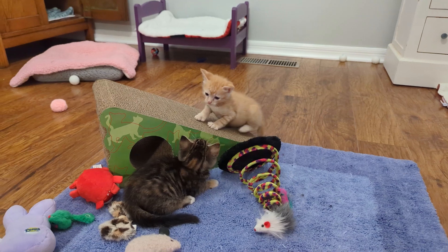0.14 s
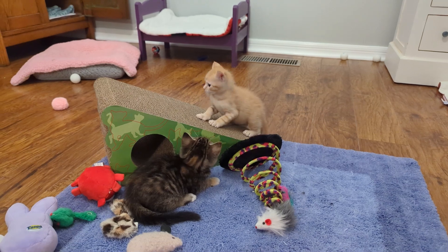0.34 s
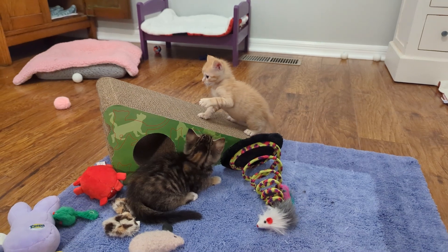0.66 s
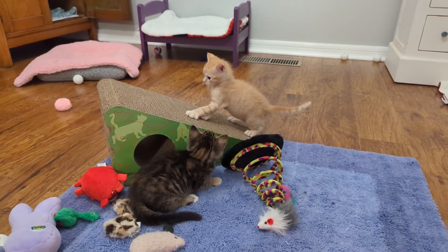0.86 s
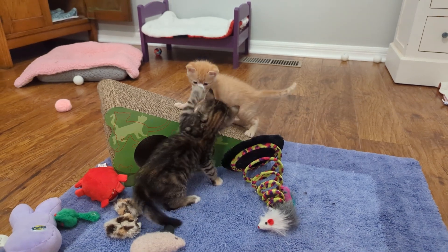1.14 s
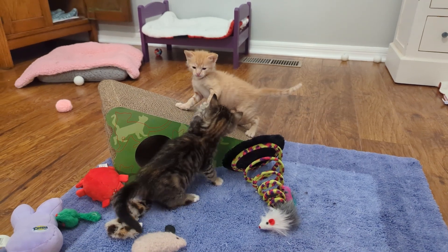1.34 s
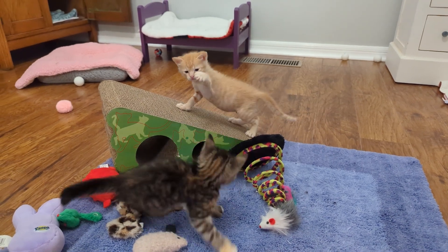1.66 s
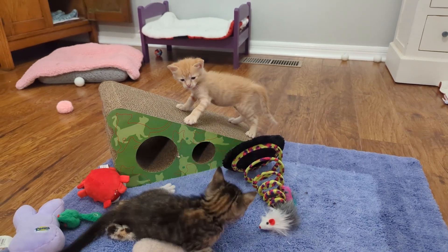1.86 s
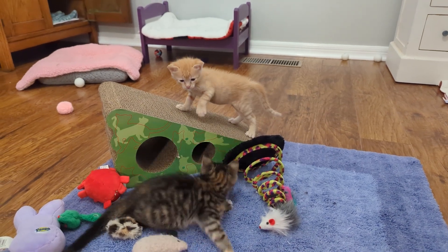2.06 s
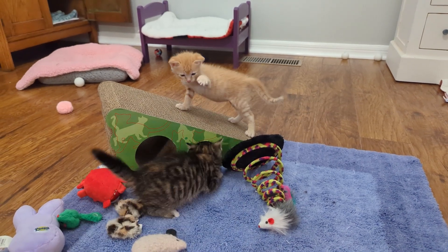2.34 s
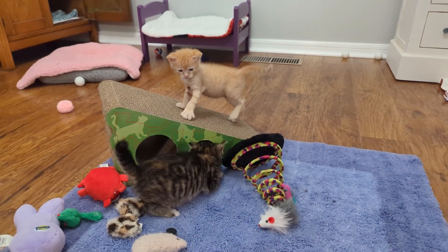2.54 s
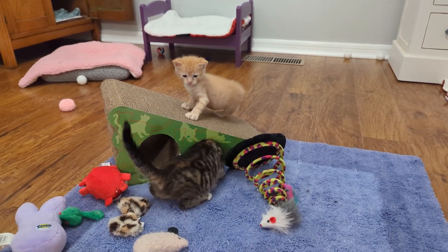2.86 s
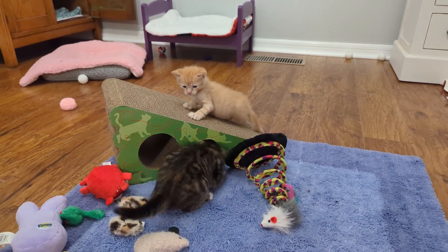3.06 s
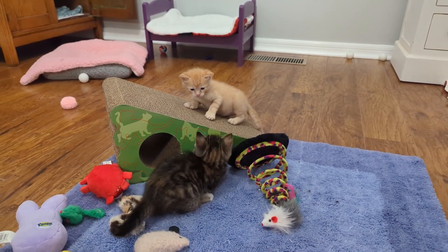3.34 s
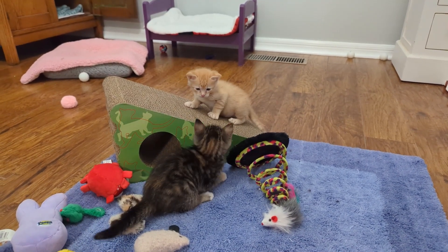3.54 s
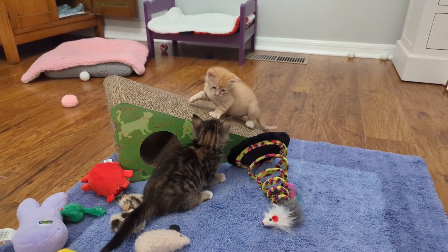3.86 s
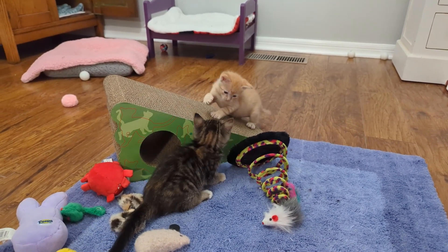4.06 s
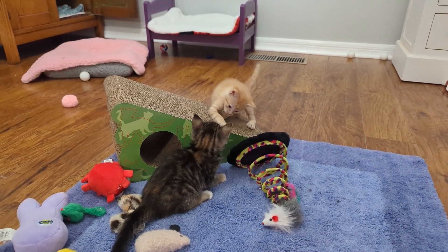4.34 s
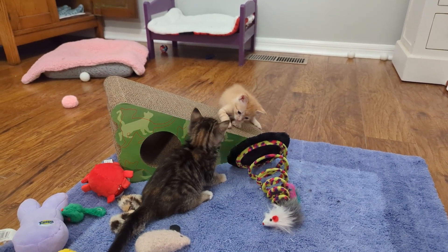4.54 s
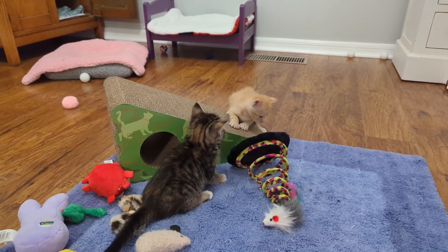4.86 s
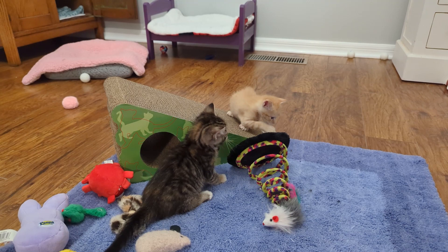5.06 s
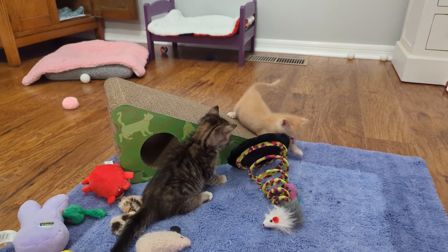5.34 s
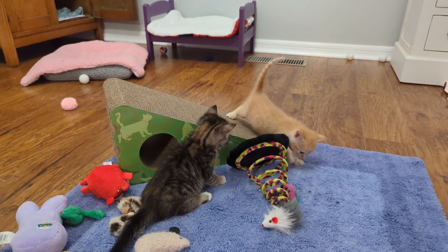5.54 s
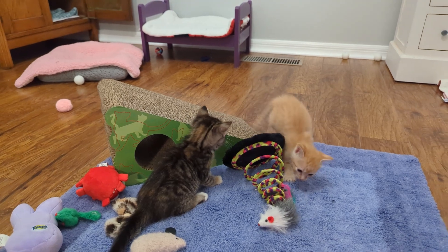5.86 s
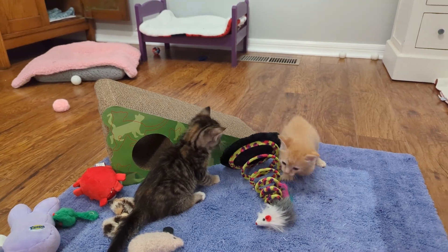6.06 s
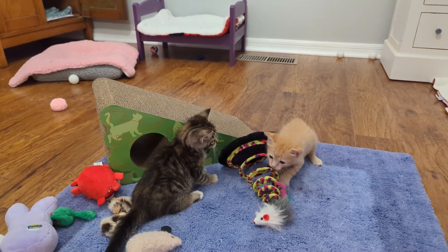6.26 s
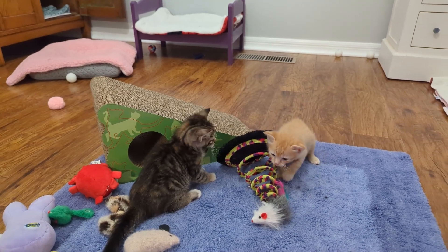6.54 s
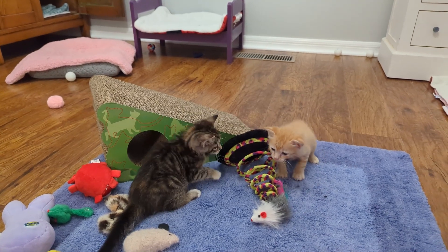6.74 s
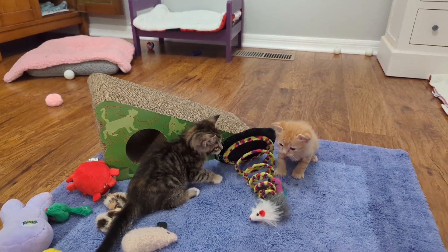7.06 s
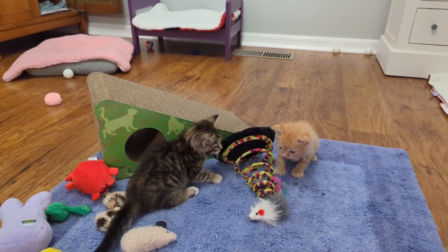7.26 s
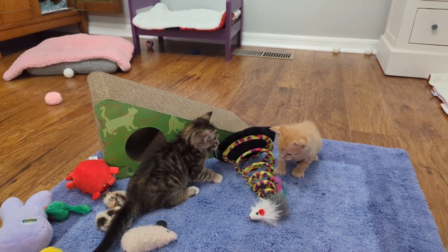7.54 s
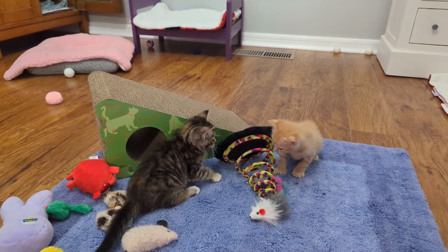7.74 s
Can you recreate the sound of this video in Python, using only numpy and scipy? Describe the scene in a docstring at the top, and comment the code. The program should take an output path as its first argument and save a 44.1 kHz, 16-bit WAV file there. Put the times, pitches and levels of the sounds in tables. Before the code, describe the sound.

Over a steady low fan hum, small claws tick, scratch and tap corrugated cardboard, busiest early on, then fading to faint rustles and a soft thump.

```python
"""In a quiet room, two kittens climb a hollow corrugated cardboard ramp on a rug.
A fan motor hums through a floor vent: wandering tones over low rumble, airflow noise and a faint whine.
Claws knock (short bursts and box ringing) and snap free (bright ticks); paws rub (shaped noise)
and land (dull bursts and puffs), and the floor booms faintly. Knocks, snaps and landings get echoes.
Two spaced microphone ports hiss faintly."""
import sys
import numpy as np
from scipy import signal
from scipy.fft import rfft, irfft, next_fast_len
from scipy.io import wavfile
from scipy.ndimage import map_coordinates

SR = 44100
rng = np.random.default_rng(int(sys.argv[2]) if len(sys.argv) > 2 else 0)


def store_pcm(level_fs):
    """Save levels as 16-bit WAV."""
    pcm = np.round(np.clip(level_fs, -1, 1) * 32767).astype(np.int16)
    wavfile.write(sys.argv[1], SR, np.atleast_2d(pcm).T)


N = 348831  # length in samples


def amp(db):
    """Turns decibels into gain."""
    return 10 ** (np.asarray(db) / 20)


def unit(x):
    """Scales a sound to an average (rms) level of 1."""
    return x / np.sqrt(np.mean(x ** 2) + 1e-20)


def along(points, hz):
    """Reads a curve of (pitch, value) points, spacing pitch the way we hear it (log)."""
    f, v = np.transpose(points)
    return np.interp(np.log(hz + 1), np.log(f + 1), v)


def curves(rows):
    """Draws a line through each column after the time, one value per sample."""
    s, *cols = np.transpose(rows)
    return np.array([np.interp(np.arange(N) / SR, s, c) for c in cols])


def wobble(rate):
    """Draws a smooth random curve through a given number of random points a second."""
    knots = rng.standard_normal(int(N * rate / SR) + 4)
    return map_coordinates(knots, [np.arange(N) * rate / SR])


def filtered(x, response):
    """Multiplies each frequency in the sound by a (possibly complex) response."""
    m = next_fast_len(N + SR // 2)  # room for the sound to ring out
    hz = np.fft.rfftfreq(m, 1 / SR)
    return irfft(rfft(x, m) * response(hz), m)[..., :N]


def rush(spectrum, alike, pair):
    """Colours two unrelated noises and mixes them into stereo, as alike left and right as asked."""
    def mid_side(hz):
        turn = np.arccos(np.clip(along(alike, hz), -.3, 1)) / 2
        return amp(along(spectrum, hz)) * [np.cos(turn), np.sin(turn)]

    mid, side = filtered(pair, mid_side)
    return unit(np.array([mid + side, mid - side]))


def pan(left_right_db):
    """Splits a left-right level difference into two gains; plus is left."""
    return amp([[left_right_db / 2], [-left_right_db / 2]])


def add(track, s, sound, left_right_db):
    """Lays a mono sound on a stereo track."""
    at = round(s * SR)
    track[:, at:at + len(sound)] += pan(left_right_db) * sound


def burst(hz, cycles, t):
    """A short wave that swells for the given number of cycles, then dies away."""
    u = t * hz / cycles
    return np.e * u * np.exp(-u) * np.sin(2 * np.pi * hz * t)


# how strongly the vent blows: start_s, rumble_db, airflow_db
VENT_LEVELS = [(0.0, -49.5, -75), (0.37, -53, -74.5), (2.09, -49.5, -69.5), (2.82, -48.5, -67.5),
               (4.21, -49, -69.5), (4.6, -48, -67.5), (7.91, -49, -70)]
# fan motor tones, around a wandering level: pitch_hz, level_db, wander_db, left_right_db, left_lead_rad
MOTOR_TONES = [(59.65, -71.5, 2.5, -1, 0), (75.3, -65.5, 4, 2.5, 0.013), (109.5, -53.5, -0.3, -0.8, 0.26),
               (163.3, -70.5, 2, 6.5, 0.31), (209.8, -59, 1.5, -3, 0.16), (273.3, -72.5, 3.5, 6, 0.15),
               (332.2, -61, 1.6, 5.5, -0.24), (350.8, -57.5, 2.5, 0, 0.35),
               (416.6, -74.5, 0.5, -4.5, -0.62)]
# colour of the low rumble: pitch_hz, relative_level_db (per Hz)
RUMBLE_COLOUR = [(20, -21), (35, -17), (55, 11.5), (90, 3), (140, 8), (195, 6.5), (250, 7), (350, 8.5),
                 (400, 1), (470, -1.5), (560, -45.5)]
# colour of the moving air: pitch_hz, relative_level_db (per Hz)
AIRFLOW_COLOUR = [(300, -32), (480, -6.5), (660, -10.5), (830, -9.5), (1060, -14), (1580, -20.5),
                  (1850, -25), (2400, -33.5), (3400, -36.5), (4400, -46.5), (6000, -89.5)]
# how alike the vent noise is on both sides: pitch_hz, likeness (no unit; below -0.3 counts as -0.3)
VENT_LIKENESS = [(60, 0.93), (110, 0.96), (200, 0.92), (380, 0.76), (700, 0.15), (1290, -0.43),
                 (2380, -0.86), (4400, 0.53), (8120, -0.16), (15000, -0.13)]


def vent():
    """Motor tones wander a little in level and phase over duct rumble and airflow noise."""
    rumble_db, airflow_db = curves(VENT_LEVELS)
    t = np.arange(N) / SR
    tones = np.zeros((2, N))
    for hz, db, wander_db, left_right_db, lead in MOTOR_TONES:
        side_lead = np.array([[lead / 2], [-lead / 2]])
        phase = 2 * np.pi * hz * t + 0.22 * wander_db * wobble(3.5) + side_lead
        level = amp(db + 3.5 + wander_db * np.tanh(wobble(9)))
        tones += level * pan(left_right_db) * np.sin(phase)
    rumble = amp(-6.5) * rush(RUMBLE_COLOUR, VENT_LIKENESS, rng.standard_normal((2, N)))
    airflow = rush(AIRFLOW_COLOUR, VENT_LIKENESS, rng.standard_normal((2, N)))
    flicker_db = 0.46 * wobble(8.7)
    motor_gain = amp(rumble_db - rumble_db.mean())  # the tones rise and fall with the rumble
    return amp(rumble_db) * rumble + motor_gain * tones + amp(airflow_db + flicker_db) * airflow


# air past the grille, around a flickering level: pitch_hz, width_hz, level_db
GRILLE_WHINE = (3430, 110, -100)


def whine():
    """Air past the grille makes a narrow, flickering band of noise that follows the airflow level."""
    hz, width, db = GRILLE_WHINE
    airflow_db = curves(VENT_LEVELS)[1]
    band = filtered(rng.standard_normal((2, N)), lambda f: np.exp(-((f - hz) / width) ** 2))
    level_db = db + airflow_db - airflow_db.mean() + 1.5 * wobble(6.2)
    return amp(level_db) * unit(band)


# claws knocking the cardboard flutes: start_s, level_db, pitch_hz, left_right_db, swell_cycles
CLAW_KNOCKS = [(0.422, -67, 1440, 2, 0.75), (0.9453, -61, 2160, 3, 1.2), (0.9515, -53.5, 1660, -2, 0.92),
               (1.576, -67, 1340, -6, .88), (1.871, -36, 2340, 4, 0.66), (1.8808, -38, 2020, -2, .48),
               (1.889, -31.5, 2040, -6, 0.3), (2.0293, -60, 1540, 4, .86), (2.374, -57, 1730, 0, 0.58),
               (2.5713, -62, 1540, 3, 0.68), (2.5975, -31.5, 2980, -.5, 1.01),
               (2.6044, -42, 1960, -5, 0.45), (2.7032, -44, 1860, 3, 0.53), (2.7332, -42.5, 2210, 4, 1.01),
               (2.9416, -34.5, 2190, 2.5, 0.87), (3.0309, -41.5, 1370, -1, 0.72),
               (3.116, -46, 2020, 2, 1.4), (3.22, -62, 1480, -4, .78), (3.7848, -65, 1430, 0, 1.1),
               (3.894, -64, 1380, 0, .99), (4.3926, -55, 1290, -1, 0.83), (4.3968, -48, 1380, 1, .7),
               (4.473, -57.5, 1280, -2, 0.96), (4.6264, -48, 1890, -1, .95), (4.6416, -47.5, 1240, 5, 0.75),
               (5.61, -58, 1000, -6, .95), (5.8324, -63, 1320, 2, 1.1), (5.864, -63, 1340, 2, .83),
               (6.1858, -58, 1520, 1, 0.87), (6.194, -56.5, 1200, 4, 0.88), (6.224, -60.5, 1274, 1, 0.69),
               (6.936, -60.5, 1190, -1.5, .95), (7.594, -64, 1210, 1, 0.79), (7.79, -56.5, 1460, 6, 0.69)]
# ringing of the hollow ramp, varied at each knock: pitch_hz, relative_level_db, time_to_fall_60_db_s
BOX_RINGS = [(640, -2.5, 0.031), (787, -6, 0.055), (1140, -2, 0.01), (1550, 0.5, 0.015), (2100, 11.5, .02),
             (2750, 5, .015), (3500, -6, .012)]
RING_DB = -20  # added to the ring levels, under the knock


def knocks():
    """A claw knocks the flutes in a short burst and the hollow box rings on."""
    track, t = np.zeros((2, N + SR)), np.arange(SR // 8) / SR
    for s, db, knock_hz, left_right_db, cycles in CLAW_KNOCKS:
        ring = np.zeros(len(t))
        for hz, level, t60 in BOX_RINGS:
            decay = amp(level + rng.normal(0, 1.1) - 60 * t / t60)
            ring += decay * np.sin(2 * np.pi * hz * rng.normal(1, 0.07) * t)
        ring *= 1 - np.exp(-t / 0.0055)  # soft start
        knock = burst(knock_hz, np.clip(cycles, .4, 2.5), t) + amp(RING_DB) * ring
        add(track, s, amp(db) * knock, left_right_db)
    return track[:, :N]


# paws and fur rubbing, one row a stroke; it is loudest from start_s until the hold ends:
# start_s, swell_s, hold_s, fade_db_per_s (before FADE_SPEEDS), box_db, card_db, fibre_db
RUB_STROKES = [(0.429, 0.0077, 0.0022, 900, -87, -79, -85), (0.957, .012, .002, 598, -76, -67, -90),
               (0.99, .015, .02, 300, -88, -88, -85), (1.147, 0.078, .03, 298, -69.5, -81.5, -103),
               (1.235, .04, .002, 300, -74, -78, -92), (1.288, .025, .002, 400, -70, -81, -83.5),
               (1.471, .03, .05, 400, -80, -77.5, -80), (1.583, 0.0094, 0.0092, 350, -72, -74.5, -77),
               (1.877, 0.006, .015, 280, -49, -46.5, -58.5), (2.029, 0.017, 0.0022, 398, -71, -73, -77),
               (2.146, 0.068, .002, 252, -76, -79.5, -89.5), (2.377, .008, .002, 450, -79, -68, -95),
               (2.6, .006, 0.0016, 700, -60.5, -46.5, -58), (2.705, .03, 0.051, 300, -69, -57, -58.5),
               (2.798, .08, 0.039, 350, -72, -69, -68.5), (2.944, 0.013, .002, 350, -69, -56, -79),
               (3.075, 0.17, .06, 200, -65, -60.5, -66), (3.17, .05, .025, 500, -68, -67, -73.5),
               (3.321, 0.24, 0.12, 57, -73.5, -74, -86), (3.78, 0.035, .002, 400, -72, -79.5, -91.5),
               (3.898, .008, 0.0018, 248, -73.5, -72.5, -84.5), (4.24, .007, .002, 400, -75, -95, -87),
               (4.399, .011, 0.0014, 599, -51.5, -54.5, -60), (4.479, 0.017, 0.0016, 700, -63, -62.5, -67),
               (4.52, .03, .025, 300, -70, -77, -84.5), (4.574, .02, 0.025, 300, -67, -67, -72.5),
               (4.63, .05, .015, 300, -62.5, -62, -65), (4.69, .02, .01, 400, -76, -74, -79),
               (4.768, .12, .002, 300, -68, -66, -75), (5.01, 0.036, 0.0018, 350, -83.5, -78.5, -91),
               (5.289, 0.059, .002, 350, -61.5, -74, -86.5), (5.365, 0.056, .002, 200, -72, -81, -84.5),
               (5.477, 0.11, .002, 100, -75, -83, -86), (5.616, .05, .03, 201, -70, -90.5, -95),
               (5.716, .08, .002, 150, -81, -93, -89), (5.868, 0.056, 0.0023, 453, -72.5, -74, -91.5),
               (6.045, .01, .002, 349, -81, -84.5, -85.5), (6.187, .015, 0.041, 500, -61, -75, -92),
               (6.94, .06, .002, 199, -71.5, -88, -94), (7.795, .05, 0.0022, 350, -67, -83.5, -90)]
# times the stroke's fade: box, card, fibre (no unit)
FADE_SPEEDS = [.7, 1, 1.4]
SWELL_DB = 22  # a stroke rises by this much over its swell time


def strokes():
    """Gains of box, card and fibre: each stroke swells, holds, fades and drags on faintly."""
    def column(values):
        return np.array(values)[:, None]

    drag_db = column([-7.5, -12.5, -21])  # under the stroke: box, card, fibre
    drag_fade = column([110, 100, 160])  # dB per s
    power = np.zeros((3, N + SR))
    for s, swell_s, hold_s, fade, *peak_db in RUB_STROKES:
        at = max(round((s - .3) * SR), 0)  # leave time for the swell
        t = (at + np.arange(SR)) / SR - s
        after = np.maximum(t - hold_s, 0)
        swell = SWELL_DB * np.minimum(t, 0) / swell_s
        falling = np.maximum(-fade * column(FADE_SPEEDS) * after, drag_db - drag_fade * after)
        power[:, at:at + SR] += amp(2 * (column(peak_db) + swell + falling))
    return np.sqrt(power[:, :N])


# colour of rubbing through the air in the ramp: pitch_hz, relative_level_db (per Hz)
HOLLOW_COLOUR = [(380, -37), (520, 0), (640, 0.5), (780, 2.5), (950, -1.5), (1200, -28), (2000, -88)]
# colour of rubbing through the card: pitch_hz, relative_level_db (per Hz)
CARD_COLOUR = [(600, -44), (1000, -6.5), (1300, -2.5), (1700, -3), (2150, -4.5), (2600, -10), (3400, -11),
               (4100, -17.5), (5200, -26), (9000, -89.5)]
# colour of tearing fibres: pitch_hz, relative_level_db (per Hz)
FIBRE_COLOUR = [(2500, -45.5), (4200, -5), (5000, -4), (6400, -1.5), (8000, -1), (9500, -4), (11800, -1),
                (14000, -4.5), (16000, -8), (17000, -56)]


def rubbing():
    """Dense uneven slips sound through the hollow and the card, and as fibres tearing."""
    box_gain, card_gain, fibre_gain = strokes()
    clumps = amp(1.2 * wobble(60))  # slips bunch under the stroke
    card_grain = clumps * amp(2.5 * wobble(400))
    fibre_grain = clumps * amp(1.8 * wobble(900) + 1.2 * wobble(220))
    # the short lists: pitch in Hz, left-right likeness
    box = rush(HOLLOW_COLOUR, [(700, 0.25)], clumps * rng.standard_normal((2, N)))
    card = rush(CARD_COLOUR, [(1000, .1), (4000, .2)], card_grain * rng.standard_normal((2, N)))
    fibre = rush(FIBRE_COLOUR, [(5000, .05)], fibre_grain * rng.standard_normal((2, N)))
    return box_gain * box + pan(1.6) * (card_gain * card + fibre_gain * fibre)


# claw tips snapping free: start_s, level_db, pitch_hz, left_right_db
CLAW_SNAPS = [(0.7632, -64, 12100, 12), (0.9458, -62, 6460, 2), (0.9866, -70, 6660, 3),
              (0.9965, -64, 11400, 8), (1.2836, -61.5, 12000, 7), (1.5074, -69, 11700, 4),
              (1.521, -66, 5570, 8), (1.5778, -62.5, 6200, 8), (1.593, -60, 6000, 8.5),
              (1.8715, -41.5, 6380, 6), (1.8808, -50, 13020, 2.5), (1.8891, -30, 9200, 1.5),
              (2.0285, -64, 5380, -3.5), (2.0368, -66.5, 6230, 0), (2.5982, -39, 5700, 10.5),
              (2.6974, -52.5, 5380, -1.5), (2.7025, -53, 11500, 3), (2.7344, -48, 6300, 5),
              (2.9404, -65.5, 6760, 1.5), (3.036, -59, 11300, 0), (3.1545, -57, 11800, 2),
              (3.893, -58, 13540, 1), (3.9362, -55.5, 14100, 8), (4.2371, -64.5, 10500, 9),
              (4.2667, -71, 13000, 1.5), (4.3967, -46.5, 8500, -7), (4.4768, -52.5, 6060, 10),
              (4.4862, -58.5, 5270, 4), (4.6894, -63, 6190, 0.5), (4.8165, -68.5, 14100, 4),
              (5.01, -69.5, 6220, 6), (5.368, -71, 13100, 7), (5.662, -72, 8990, 4),
              (6.0377, -61.5, 6100, 9), (6.109, -72, 10550, 4), (6.1946, -72.5, 5330, -0.5),
              (6.9364, -70.5, 5340, 4)]
STRAY_TICKS = 70  # how many faint extra ticks
FRAY_DB = -5  # torn fibres under the tick


def snaps():
    """Claws snap free in bright ticks with a noisy fray; faint strays fall at random."""
    track, t = np.zeros((2, N + SR)), np.arange(SR // 50) / SR
    when, size, pitch, side = rng.random((STRAY_TICKS, 4)).T
    stray_db = -85 + 9.5 * size ** 3  # mostly near the faint end
    strays = np.transpose([when * N / SR, stray_db, 5000 + 9000 * pitch, 8.5 * side - 1.5])
    for s, db, hz, left_right_db in [*CLAW_SNAPS, *strays]:
        # torn fibres spread the tick over the treble
        fray = amp(FRAY_DB - 60 * t / 0.0024) * np.diff(rng.standard_normal(len(t) + 1))
        add(track, s, amp(db) * (burst(hz, 1.6, t) + fray), left_right_db)
    return track[:, :N]


# paws landing: start_s, level_db, pitch_hz, left_right_db
PAW_LANDINGS = [(1.869, -48.5, 287, 20), (4.394, -64, 332, -3), (5.606, -49.5, 348, -9),
                (6.182, -36, 296, 1), (6.192, -36.5, 332, -3)]
# the floor booms faintly: start_s, level_db, pitch_hz
FLOOR_BOOMS = [(2.851, -53, 69.5), (4.62, -63, 60.3), (5.311, -50, 64.2)]


def paws():
    """Soft landings, each a dull thump with a puff of low-passed noise, and low booms of the floor."""
    track, t = np.zeros((2, N + SR)), np.arange(SR // 5) / SR
    soft = signal.butter(4, 2600, fs=SR, output="sos")
    puff_shape = amp(-24.5 - 60 * t / 0.053) * (1 - np.exp(-t / 0.0025))
    for s, db, hz, left_right_db in PAW_LANDINGS:
        puff = puff_shape * unit(signal.sosfilt(soft, rng.standard_normal(len(t))))
        add(track, s, amp(db) * (burst(hz, 1.4, t) + puff), left_right_db)
    for s, db, hz in FLOOR_BOOMS:
        add(track, s, amp(db) * burst(hz, 0.99, t), 0)
    return track[:, :N]


# how long the room rings: pitch_hz, time_to_fall_60_db_s
ROOM_RING = [(300, 0.27), (2000, 0.33), (10000, 0.15)]
# floor and furniture, with delays varied a little per side: delay_s, level_db (before dulling)
NEAR_ECHOES = [(.0023, -5.5), (.0041, -16.5), (.0075, -12.5), (0.013, -16.5)]
PORT_LAG = .00009  # s by which the right port hears the direct sound late


def room(x, wet_db):
    """Adds dull near echoes, and a fading noise tail drawn anew for each quarter second."""
    lag = np.array([[0], [PORT_LAG]])

    def near(hz):
        direct = np.exp(-2j * np.pi * hz * lag)
        echoes = 0
        for s, db in NEAR_ECHOES:
            delay = s * rng.normal(1, 0.067, (2, 1))
            echoes = echoes + amp(db) * np.exp(-2j * np.pi * hz * delay)
        return direct + echoes / (1 + 1j * hz / 4000)  # echoes lose treble

    out, step = np.pad(filtered(x, near), ((0, 0), (0, SR))), SR // 4
    for at in range(0, N, step):
        hz, t, z = signal.stft(rng.standard_normal((2, SR // 3)), SR, nperseg=256)
        decay = amp(-60 * t / along(ROOM_RING, hz)[:, None])
        tail = signal.istft(z * decay, SR, nperseg=256)[1]
        wet = signal.fftconvolve(x[:, at:at + step], tail / np.linalg.norm(tail[0]), axes=1)
        start = at + 200  # the tail begins 200 samples late
        out[:, start:start + wet.shape[1]] += amp(wet_db) * wet
    return out[:, :N]


def scene():
    """Kittens on the ramp in the room, over the vent."""
    claws_and_paws = knocks() + snaps() + paws()
    return room(claws_and_paws, wet_db=-10.0) + rubbing() + vent() + whine()


# colour of the microphone hiss: pitch_hz, relative_level_db (per Hz)
HISS_COLOUR = [(1500, -20), (2500, 9), (4200, -1.5), (6500, 0.5), (7200, -7.5), (10500, -8), (11700, -2.5),
               (13000, -6), (16000, -8), (17000, -58)]
TOP_HZ, FADE_IN = 15800, 0.024  # band limit in Hz, fade-in time in s


def record(dry):
    """The ports add their own hiss, the sound fades in, and nothing passes above the band limit."""
    hiss = amp(-97) * rush(HISS_COLOUR, [(5000, .05)], rng.standard_normal((2, N)))
    fade = np.clip(np.arange(N) / SR / FADE_IN, 0, 1)
    return filtered((dry + hiss) * fade, lambda hz: hz < TOP_HZ)


dry = scene()
out = record(dry)
store_pcm(out)
```